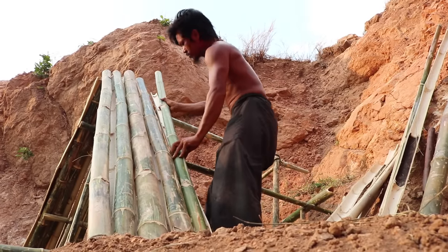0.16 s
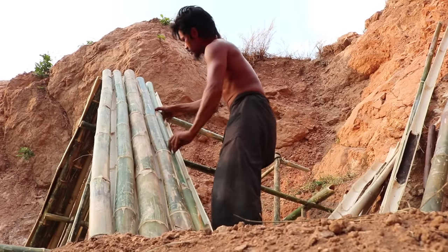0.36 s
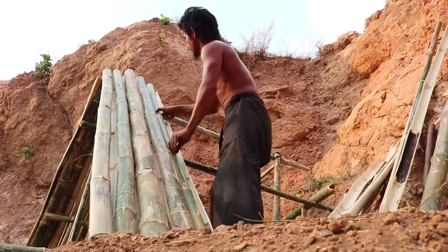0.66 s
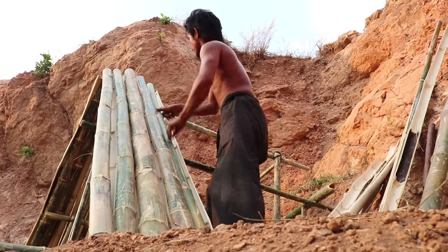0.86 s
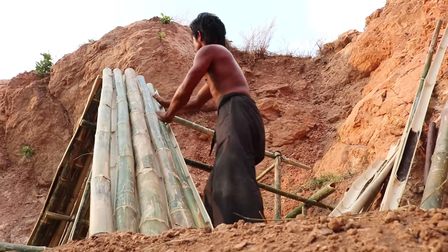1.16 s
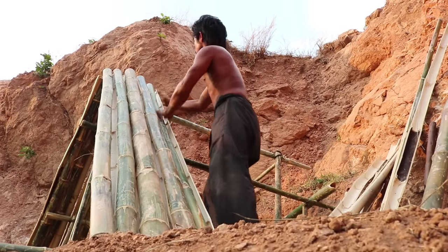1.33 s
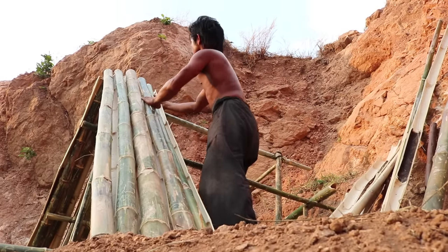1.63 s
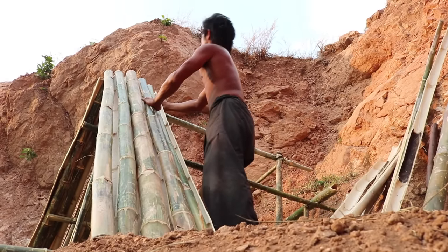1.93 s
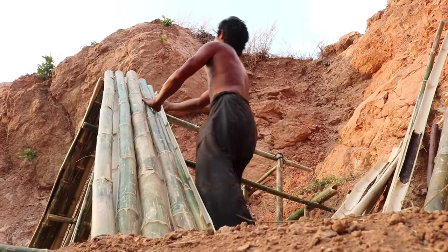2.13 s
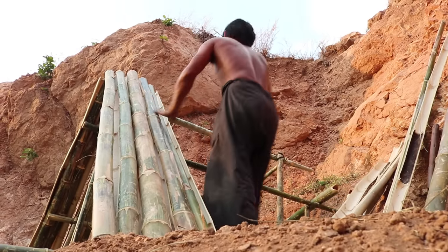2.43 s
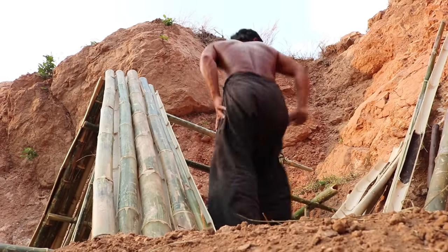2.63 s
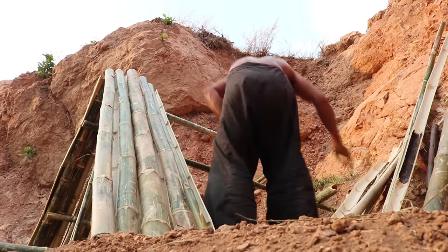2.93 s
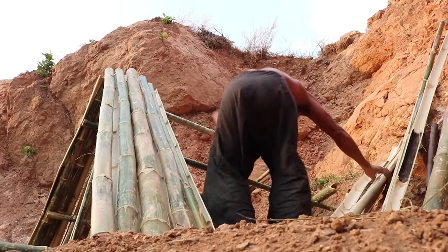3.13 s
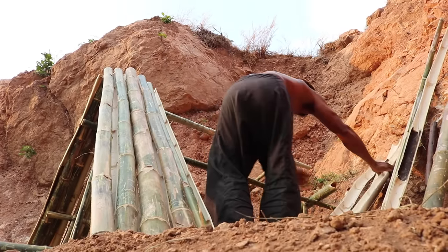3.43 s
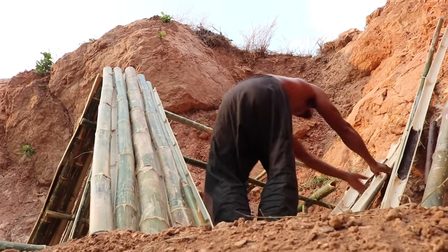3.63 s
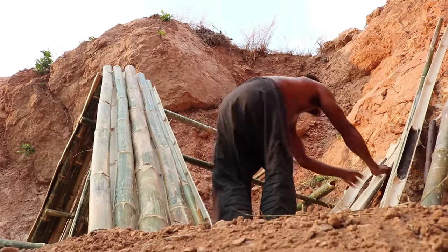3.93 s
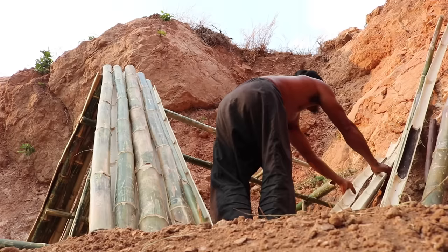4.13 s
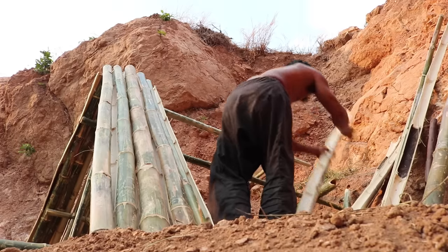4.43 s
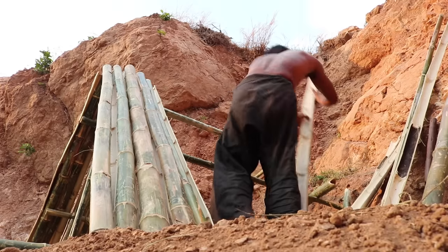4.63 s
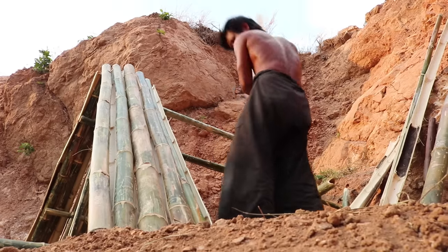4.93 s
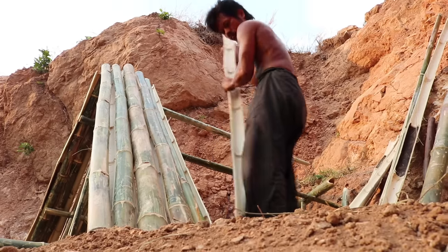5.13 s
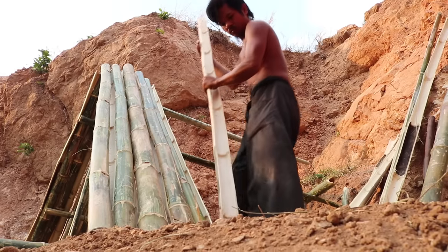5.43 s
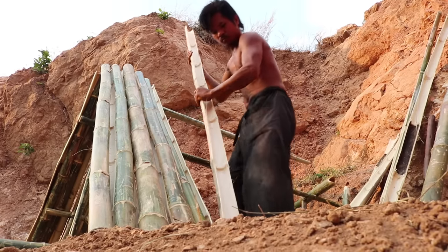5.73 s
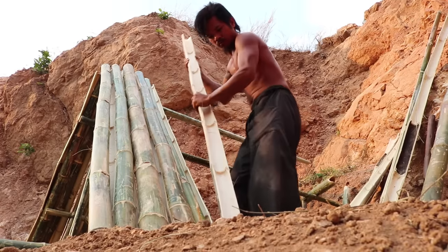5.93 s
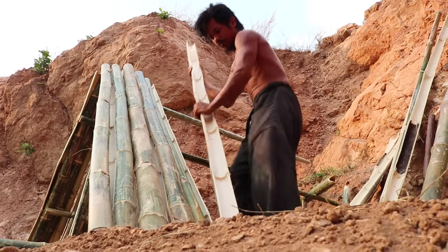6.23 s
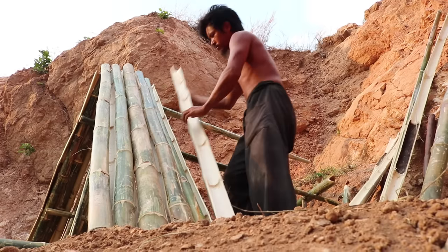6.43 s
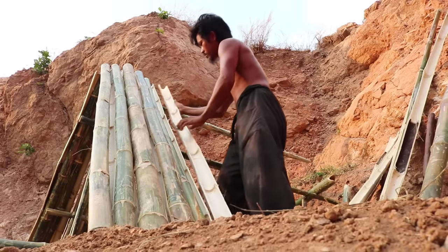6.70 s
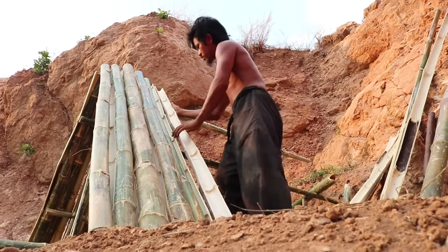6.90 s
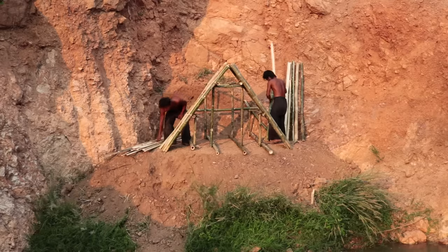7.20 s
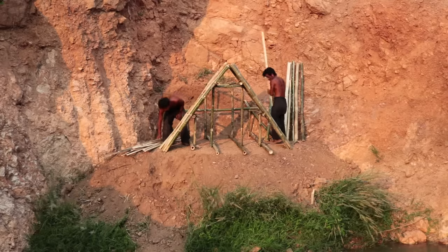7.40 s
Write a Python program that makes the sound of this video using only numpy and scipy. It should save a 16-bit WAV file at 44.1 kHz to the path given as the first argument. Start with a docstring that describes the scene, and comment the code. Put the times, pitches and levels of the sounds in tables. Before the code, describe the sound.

Split bamboo poles knock, clack and chatter together in uneven bursts outdoors, with woody rubs, soft soil thuds and faint cloth swishes over quiet air.

```python
"""A pit of dry earth: a worker stacks split bamboo poles against a frame.
Poles knock, chatter and rub: impulse trains drive random-detuned pole modes and dense noise rings.
Feet and pole ends thud, trousers swish, soil ticks: shaped noise. The earth bank adds a short, dull echo.
Behind: quiet air as banded noise, a faint narrow insect buzz, low puffs of wind.
Late on, all sound drops out briefly; the air returns quieter."""
import sys
import numpy as np
from scipy import signal
from scipy.io import wavfile
from scipy.ndimage import map_coordinates

SR = 44100
rng = np.random.default_rng(int(sys.argv[2]) if len(sys.argv) > 2 else 0)


def pcm_store(signal):
    """Save signal as 16-bit PCM."""
    levels = np.round(np.clip(np.atleast_2d(signal), -1, 1) * 32767)
    wavfile.write(sys.argv[1], SR, levels.astype(np.int16).T)


N = 333395
TIME_S = np.arange(N) / SR

# pole on pole: start_s, wall_level_db, chatter_s (decay constant), tone_hz, hardness_0_to_1,
# hollow_db (re wall level)
KNOCKS = [(.318, -28, 0.0032, 885, 0.43, -10.5), (.4, -43.5, 0.006, 980, 0.78, -7),
          (0.4362, -31.5, 0.0014, 1100, 0, -2.5), (0.4412, -17, 0.00071, 1170, 0.35, -17),
          (.48, -35.5, 0.00087, 1130, 0.3, 2), (0.491, -34.5, .001, 1070, 0.54, -2.5),
          (.546, -37.5, 0.011, 1170, 0.46, 4.5), (.651, -34, 0.0075, 1180, 0.42, -1),
          (.666, -30, .023, 980, .53, -14), (0.6827, -36, 0.0013, 1040, 0.97, -10),
          (0.694, -31.5, 0.0036, 1110, 0.42, 2.5), (1.023, -49, 0.0023, 1070, 0.25, 4.5),
          (1.217, -38, 0.013, 930, 0.52, -5), (1.508, -59, 0.0014, 965, 1, -5),
          (1.543, -38.5, 0.0021, 1145, 0.4, 1), (1.563, -38, 0.0025, 974, 0.56, -2),
          (1.568, -30.5, 0.0043, 996, 0.51, -3.5), (1.585, -39.5, 0.012, 1150, 0.73, -15),
          (1.605, -25, 0.0038, 997, 0.35, -4), (1.641, -46, 0.013, 1220, 0.67, 0),
          (1.676, -32, 0.0011, 1075, 0, -1), (1.688, -39, 0.012, 930, 0.36, 0),
          (1.7465, -39.5, .001, 1160, 0.38, -12), (1.985, -53.5, 0.0014, 970, 0.83, -9),
          (2.578, -39, 0.0017, 1020, .62, -4), (2.6815, -18, 0.00038, 1180, 0.61, -6),
          (2.869, -40.5, 0.0028, 1020, 0.35, -0.5), (2.875, -35.5, 0.0052, 1090, 0.47, -2.5),
          (3.471, -27, 0.013, 870, 0.65, -6), (3.486, -25, 0.022, 860, 0.53, -10),
          (3.528, -30, 0.02, 1040, 0.47, -8), (3.613, -45.5, 0.0074, 1360, 0.74, -13),
          (3.636, -44.5, 0.0071, 1150, 0.78, -12), (3.686, -24, 0.0017, 860, 0.34, -11),
          (3.74, -44, 0.023, 1115, 0.57, -23), (5.542, -54.5, 0.008, 1040, 0.55, 9),
          (5.575, -31.5, 0.019, 1140, .63, 1.5), (5.607, -39.5, 0.046, 1047, 0.55, -3),
          (5.815, -61, .001, 1040, 0.91, -4), (5.982, -49.5, 0.0013, 1450, 0.81, -11),
          (6.131, -44, 0.0018, 940, 0.66, -23), (6.694, -55.5, 0.0011, 1260, .92, -2),
          (6.727, -60.5, .002, 1270, 0.94, -2), (6.8571, -22, 0.0027, 1010, 0.54, -10),
          (6.8785, -18.5, 0.0018, 990, 0.17, -11), (6.891, -34.5, 0.0026, 1140, 0.38, 7),
          (7.459, -58.5, 0.0034, 1195, 0.35, -10)]
# poles and hands sliding: start_s, length_s, wall_level_db, hardness_0_to_1, hollow_db (re wall level)
RUBS = [(0.056, 0.037, -56.5, 0.65, 8.5), (.1, 0.058, -44.5, 0.4, -4), (.35, 0.037, -37.5, 0.36, -19),
        (0.569, 0.091, -49, 0.58, -5), (0.911, 0.081, -46.5, 0.69, -12), (1.256, 0.053, -44, 0.52, -1.5),
        (1.408, 0.16, -52.5, 0.67, -15), (2.099, 0.045, -52, .3, -4), (2.723, 0.05, -53.5, 0.8, -12),
        (3.065, 0.035, -48, 0.16, -16), (3.149, 0.066, -52, .12, -19), (3.221, .11, -54, 0.71, -4),
        (4.157, 0.034, -45, 0.46, 1), (4.292, 0.14, -46, 0.21, 4.5), (4.441, .046, -40.5, 0.22, -2),
        (4.571, .035, -48.5, 0.71, 2), (4.798, 0.047, -55.5, 0.96, 6), (5.701, 0.03, -38.5, 0.37, -15),
        (5.839, 0.096, -39, 0.59, -9), (6.0, 0.042, -43.5, 0.37, -9), (6.044, .04, -39, 0.48, -8),
        (6.085, 0.045, -39.5, 0.48, -8), (6.222, 0.042, -42.5, .55, -1.5), (6.258, 0.038, -38, 0.56, -16),
        (7.306, 0.034, -68, 0.73, -4), (7.387, 0.057, -64.5, 0.7, -7)]
# modes of a bamboo pole, before detuning, level spread and ring factor: pitch_hz, level_db, t60_s
POLE_MODES = [(196, -15, .08), (280, -24, 0.073), (379.8, -8.5, 0.14), (454, 0, 0.049), (535.3, -1, 0.054),
              (610, -14.5, 0.0067), (816, -14, 0.029), (870, -7, 0.087), (965, -10, 0.072),
              (1075, -2.5, 0.055), (1145, -6.5, 0.062), (1290, -26, .04), (1370, -17, 0.085),
              (1492, -33, 0.025), (1826, -11, 0.049), (2090, -15.5, .035), (2212, -1, 0.028),
              (2350, -9, 0.038), (2516, -0.5, 0.038), (2720, -6.5, 0.031), (2950, -1.5, 0.015),
              (3070, -10, 0.027), (3420, -1.5, 0.02), (3756, -16.5, 0.032), (4140, -33.5, .025),
              (4100, -25, .025)]
# registers hollow, wall, clack, crack, before reach and ring factor:
# low_hz, high_hz, dense_t60_s, snap_db (re ring, before contact_db)
POLE_REGISTERS = [(204.6, 946, 0.2, -1.5), (665, 1725, 0.078, -2.5), (1760, 3730, 0.099, 2.5),
                  (4050, 8960, 0.02, -25)]
# where the poles are handled: time_s, left_lag_ms
WORK_PLACE = [(0, -0.026), (2.68, -0.089), (2.87, 0.067), (5.5, 0.06), (6.86, 0.033)]
# feet on the soil: start_s, level_db
STEPS = [(.135, -42), (2.581, -37.5), (4.188, -42.5), (4.298, -39), (4.389, -37), (4.46, -37), (4.82, -47),
         (5.638, -38.5), (6.14, -43.5), (6.29, -53)]
# trousers brush the legs at a turn or stride: peak_s, width_s (standard deviation), level_db
SWISHES = [(2.44, 0.07, -47.5), (4.38, 0.11, -52), (5.25, 0.092, -48.5), (5.62, 0.14, -51.5),
           (6.08, 0.18, -48), (6.5, 0.052, -49), (6.74, 0.15, -56)]
# spectrum of the cloth, relative: pitch_hz, level_db_per_hz
CLOTH_SPECTRUM = [(500, -10.5), (1200, 6.5), (3500, 2.5), (7000, -1.5), (10000, -6), (15000, -17)]
# spectrum of the open air, relative: pitch_hz, level_db_per_hz
AIR_SPECTRUM = [(20, -37), (45, -4), (80, -2.5), (130, 0.5), (220, -2.5), (420, -2.5), (700, -5.5),
                (1100, -6.5), (1600, -11.5), (3300, -13.5), (4500, -17), (7000, -18.5), (11000, -24),
                (15500, -29)]
# left-right likeness of air and cloth noise: pitch_hz, likeness_0_to_1
NOISE_LIKENESS = [(40, 0.45), (150, 0.6), (500, 0.32), (1500, 0.47), (4000, 0.068), (12000, 0.043)]
# puffs of wind: peak_s, level_db
GUSTS = [(0, -56), (1.6, -51), (6.29, -49), (6.97, -54), (7.185, -53), (7.475, -40)]

# (clack, crack) re wall level at hardness 0 and 1; for rubs the crack is a hiss
SOFT_KNOCK_DB, HARD_KNOCK_DB = (-22, -49), (11.5, 8)
SOFT_RUB_DB, HARD_RUB_DB = (-15, -28), (8, 4.5)
# ring time re the modes: soft knock with usual chatter; a loose pole rings longer, a hard contact damps
RING_FACTOR, USUAL_CHATTER_S = 1.9, .003
LOOSE_RING_POWER, HARD_RING_SHARE = 0.22, 0.24
CATCH_DB, CATCHES_PER_S = 2.5, 160
# lower end of a pole: thud at a 0 dB knock, share of knock dB, gain per tenfold chatter
BUTT_DB, BUTT_FOLLOWS, BUTT_CHATTER_DB = -30, 0.46, 6
PAN_DB_PER_MS = -10
CLOTH_REST_DB = -67   # between moves, until the break
AIR_DB, LATE_AIR_DB = -49, -58.5   # before, after the break
GUST_RISE_S, GUST_FALL_S, BREEZE_DB = 0.0095, 0.047, -67.5
BREAK_S, BREAK_LENGTH_S = 7.146, .021   # silence
CUTOFF_HZ = 16800


def knocks(touches_per_s, rebound, flight_s, graze_share, size=2048):
    """A first touch, a short flight, then smaller touches as the poles chatter to rest."""
    out, t = np.zeros((2, N)), np.arange(size) / SR
    lead = round(.004 * SR)
    for start_s, wall_db, chatter_s, tone_hz, hardness, hollow_db in KNOCKS:
        levels_db = register_levels_db(hardness, hollow_db, SOFT_KNOCK_DB, HARD_KNOCK_DB)
        looseness = (chatter_s / USUAL_CHATTER_S) ** LOOSE_RING_POWER
        ring_factor = RING_FACTOR * looseness * HARD_RING_SHARE ** hardness
        touches = (rng.random(size) < touches_per_s / SR) * rng.standard_normal(size)
        force = rebound * touches * np.exp(-t / chatter_s) * (1 - np.exp(-t / flight_s))
        force[0] = 1
        # the round poles graze each other just before they meet
        graze = graze_share * rng.standard_normal(lead) * np.linspace(0, 1, lead) ** 2
        force = np.concatenate([graze, force])
        parts = pole_response(ring_factor, tone_hz, levels_db[-1], contact_db=-2, tone_db=1,
                              tone_t60_s=0.038, dense_db=2.0, spread_db=1, detune=0.0356)
        add(out, start_s - lead / SR, sounded(force, parts, wall_db, levels_db, span_s=0.025))
    return out


def rubs(slips_per_s, grain_db, friction_db, size=8192):
    """Fibres catch and slip in dense uneven steps under a swelling stroke."""
    out, t = np.zeros((2, N)), np.arange(size) / SR
    for start_s, length_s, wall_db, hardness, hollow_db in RUBS:
        levels_db = register_levels_db(hardness, hollow_db, SOFT_RUB_DB, HARD_RUB_DB)
        sizes = from_db(grain_db * rng.exponential(1, size).clip(0, 4)) * rng.choice([-1, 1], size)
        slips = (rng.random(size) < slips_per_s / SR) * sizes
        stroke = np.sin(np.pi * np.minimum(t / length_s, 1)).clip(0, 1) ** 0.4
        # roughness of the other pole makes the stroke catch and let go
        roughness = np.interp(t * CATCHES_PER_S, np.arange(size), rng.standard_normal(size))
        stroke = stroke * from_db(CATCH_DB * roughness)
        parts = pole_response(0.62, 1060, levels_db[-1] - 3.5, friction_db, tone_db=10.5,
                              tone_t60_s=0.019, dense_db=0.5, spread_db=4, detune=0.024)
        add(out, start_s, sounded(slips * stroke, parts, wall_db, levels_db, span_s=length_s))
    return out


def pole_response(ring_factor, tone_hz, crack_db, contact_db, tone_db, tone_t60_s, dense_db,
                  spread_db, detune, size=8192):
    """One touch on a pole, per register: a snap, the modes, the dense ring of the stack it leans on."""
    t = np.arange(size) / SR
    hz, db, t60_s = np.transpose(POLE_MODES)
    # every pole is cut a little differently, and is touched at another spot
    hz = hz * (1 + detune * rng.standard_normal(len(hz)))
    gains = from_db(db + spread_db * rng.standard_normal(len(hz))) * rng.choice([-1, 1], len(hz))
    ringing = np.sin(2 * np.pi * hz[:, None] * t) * dying(t, ring_factor * t60_s[:, None])
    modes = gains @ ringing
    tone = np.cos(2 * np.pi * tone_hz * t) * dying(t, ring_factor * tone_t60_s)
    modes += from_db(tone_db) * tone
    # a softer contact excites the clack less far up
    reach = [1, 1, np.clip(1.404 * 2 ** (crack_db / 48), .7, 1.2), 1]
    ring_likeness = [(500, .93), (1100, 0.25), (2500, 0.5), (7000, 0.47)]   # pitch_hz, likeness_0_to_1
    stack = rng.standard_normal((3, size))
    parts = []
    for k, (low_hz, high_hz, dense_t60_s, snap_db) in enumerate(POLE_REGISTERS):
        edges_hz = low_hz, high_hz * reach[k]
        alike = np.clip(at_hz(ring_likeness, np.sqrt(low_hz * high_hz)), 0, 1)
        dense = np.sqrt(alike) * stack[0] + np.sqrt(1 - alike) * stack[1:]
        dense = dense * dying(t, ring_factor * dense_t60_s)
        is_crack = k == len(POLE_REGISTERS) - 1   # above the modes: splintery noise only
        order = 2 if is_crack else 4
        ring = band(dense if is_crack else modes + from_db(dense_db) * dense, *edges_hz, order)
        snap = band(t == 0, *edges_hz, order) * rng.choice([-1, 1])   # sign depends on the spot hit
        parts.append(unit_energy(ring) + from_db(snap_db + contact_db) * unit_energy(snap))
    return parts


def sounded(force, parts, wall_db, levels_db, span_s):
    """A force drives each register, whose energy is set by an rms level over the span."""
    hollow, clack, crack = levels_db
    gains = from_db(wall_db + np.array([hollow, 0, clack, crack])) * np.sqrt(span_s * SR)
    driven = [signal.fftconvolve(part, force[None], axes=1) for part in parts]
    return sum(gain * unit_energy(x) for gain, x in zip(gains, driven))


def register_levels_db(hardness, hollow_db, soft_db, hard_db):
    """Hollow, clack, crack re wall: the harder the contact, the more clack and crack."""
    upper_db = [soft + hardness * (hard - soft) for soft, hard in zip(soft_db, hard_db)]
    return [hollow_db, *upper_db]


def placed(x):
    """Lag and level lean the sound to the side where the poles are handled."""
    lag_ms = np.interp(TIME_S, *np.transpose(WORK_PLACE))
    pan_db = PAN_DB_PER_MS * lag_ms
    left = map_coordinates(x[0], [np.arange(N) - lag_ms * SR / 1000], order=3)
    return np.array([left * from_db(pan_db / 2), x[1] * from_db(-pan_db / 2)])


def earth_bank(x, t60_s, delay_s, top_hz, size=22000):
    """The rough bank scatters a short, dull echo: convolution with decaying noise."""
    t = np.arange(size) / SR
    scatter = rng.standard_normal(size) + 1.27 * rng.standard_normal((2, size))
    onset = 1 - np.exp(-(t / delay_s) ** 2)
    echo = band(scatter * dying(t, t60_s) * onset, 100, top_hz, order=1)
    return signal.fftconvolve(x, unit_energy(echo), axes=1)[:, :N]


def thuds(low_hz, high_hz, rise_s, t60_s, size=12000):
    """Feet and the lower end of each knocked pole hit the soil: low, decaying puffs of noise."""
    out, t = np.zeros((2, N)), np.arange(size) / SR
    butts = []
    for start_s, wall_db, chatter_s, *_ in KNOCKS:
        chatter_db = BUTT_CHATTER_DB * np.log10(chatter_s / USUAL_CHATTER_S)
        butts.append((start_s, BUTT_DB + BUTT_FOLLOWS * wall_db + chatter_db))
    for start_s, level_db in STEPS + butts:
        soil = rng.standard_normal(size) + 0.14 * rng.standard_normal((2, size))
        puff = band(soil * (1 - np.exp(-t / rise_s)) * dying(t, t60_s), low_hz, high_hz)
        add(out, start_s, from_db(level_db) * unit_energy(puff) * np.sqrt(0.011 * SR))
    return out


def grit(crumbs_per_s, spread_db, level_db, t60_s, size=400):
    """Crumbs of dry soil tick underfoot, as strongly as the legs move."""
    crumbs = (rng.random(N) < crumbs_per_s / SR) * from_db(spread_db * rng.exponential(1, N).clip(0, 3))
    crumbs = crumbs * leg_motion() * from_db(level_db)
    tick = band(rng.standard_normal((2, size)) * dying(np.arange(size) / SR, t60_s), 2700, 14000)
    return signal.fftconvolve(crumbs[None], unit_energy(tick), axes=1)[:, :N]


def trousers():
    """Cloth brushes the legs: flickering noise that follows their motion."""
    return leg_motion() * band(banded_noise(CLOTH_SPECTRUM, patchy_db=2.5), 400, 13000, order=1)


def leg_motion():
    """Gain of the moves: each swells and fades like a bell curve."""
    moves = sum(from_db(db) * np.exp(-.5 * ((TIME_S - s) / width_s) ** 2) for s, width_s, db in SWISHES)
    return moves + from_db(CLOTH_REST_DB) * (TIME_S < BREAK_S)


def open_air():
    """Quiet banded noise with the insects in it; quieter from the break on."""
    gain = from_db(np.where(TIME_S < BREAK_S, AIR_DB, LATE_AIR_DB))
    return gain * (banded_noise(AIR_SPECTRUM, patchy_db=3.5) + insects(3400, 300, re_air_db=-25))


def insects(hz, width_hz, re_air_db):
    """A far, narrow buzz: band-passed noise."""
    noise = rng.standard_normal((2, N))
    return from_db(re_air_db) * rms_one(band(noise, hz - width_hz / 2, hz + width_hz / 2, order=1))


def wind(low_hz, high_hz, pan_db):
    """Low buffets, partly separate in each channel, driven by the puffs."""
    eddies = rng.standard_normal(N) + 0.87 * rng.standard_normal((2, N))
    eddies = rms_one(band(eddies, low_hz, high_hz))
    return gust_strength() * eddies * from_db([[pan_db / 2], [-pan_db / 2]])


def gust_strength():
    """Gain of the wind: each puff rises quickly and falls back to the breeze."""
    puffs = 0
    for peak_s, level_db in GUSTS:
        away = np.maximum((peak_s - TIME_S) / GUST_RISE_S, (TIME_S - peak_s) / GUST_FALL_S)
        puffs = puffs + from_db(level_db) * np.exp(-away)
    return puffs + from_db(BREEZE_DB)


def banded_noise(spectrum, patchy_db):
    """Half-octave bands of stereo noise, each with its own flicker and likeness; rms 1."""
    edges_hz = 22 * 2 ** np.arange(0, 10, .5)
    out, white = 0, rng.standard_normal((2, 2, N))
    for k, (low_hz, high_hz) in enumerate(zip(edges_hz, edges_hz[1:])):
        mid, side = band(white[k % 2], low_hz, high_hz)
        hz = np.sqrt(low_hz * high_hz)
        alike = np.clip(at_hz(NOISE_LIKENESS, hz), -1, 1)
        gain = from_db(at_hz(spectrum, hz) + patchy_db * drift(15))
        out = out + gain * (np.sqrt(1 + alike) * mid + np.sqrt(1 - alike) * side * [[1], [-1]])
    return rms_one(out)


def drift(points_per_s):
    """Slow chance: normal random points joined by straight lines."""
    return np.interp(TIME_S * points_per_s, np.arange(1000), rng.standard_normal(1000))


def dying(t, t60_s):
    """Amplitude that falls 60 dB in t60_s."""
    return np.exp(-np.log(1000) * t / t60_s)


def band(x, low_hz, high_hz, order=2):
    """Causal Butterworth band-pass."""
    top_hz = min(high_hz, .48 * SR)
    return signal.sosfilt(signal.butter(order, [low_hz, top_hz], "band", fs=SR, output="sos"), x + 1e-18)


def at_hz(points, hz):
    """Read a curve on a log-frequency axis."""
    points_hz, values = np.transpose(points)
    return np.interp(np.log(hz), np.log(points_hz), values)


def from_db(db):
    """Decibels to gain."""
    return 10 ** (np.asarray(db) / 20)


def unit_energy(x):
    """Scale to a mean channel energy of one."""
    return x / np.sqrt(np.mean(np.sum(x ** 2, axis=-1)) + 1e-20)


def rms_one(x):
    """Scale to an rms of one."""
    return x / np.sqrt(np.mean(x ** 2) + 1e-20)


def add(out, start_s, sound):
    """Mix a sound in at a time."""
    i = round(start_s * SR)
    out[..., i:i + sound.shape[-1]] += sound[..., :N - i]


def scene():
    """Poles and their echo, feet, cloth, open air and wind."""
    struck = knocks(touches_per_s=2700, rebound=0.51, flight_s=0.0025, graze_share=0.022)
    rubbed = rubs(slips_per_s=4000, grain_db=4.0, friction_db=-3)
    poles = placed(struck + rubbed)
    echo = from_db(-18) * earth_bank(poles, t60_s=0.19, delay_s=0.0056, top_hz=5000)
    feet = thuds(low_hz=67.6, high_hz=201, rise_s=0.0018, t60_s=0.37)
    feet = feet + grit(crumbs_per_s=19, spread_db=1, level_db=20.5, t60_s=0.014)
    puffs = wind(low_hz=44.7, high_hz=116, pan_db=-2.5)
    return poles + echo + feet + trousers() + open_air() + puffs


def record(dry):
    """Silence at the break, clipping at full scale, then a steep low-pass."""
    heard = (TIME_S < BREAK_S) | (TIME_S > BREAK_S + BREAK_LENGTH_S)
    low_pass = signal.cheby2(16, 60, CUTOFF_HZ, fs=SR, output="sos")
    return signal.sosfilt(low_pass, np.clip(dry * heard, -1, 1))


dry = scene()
out = record(dry)
pcm_store(out)
```